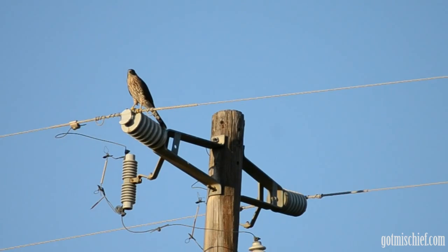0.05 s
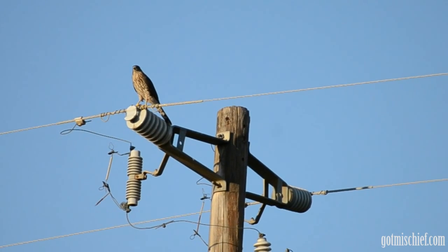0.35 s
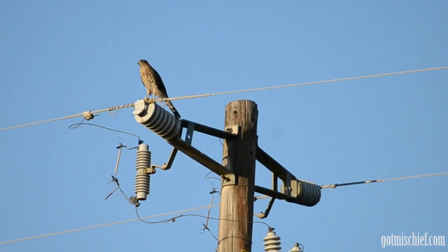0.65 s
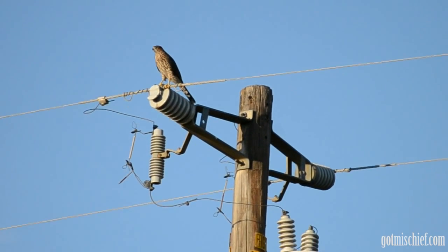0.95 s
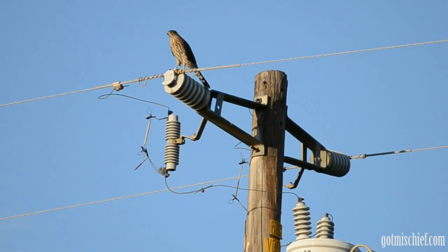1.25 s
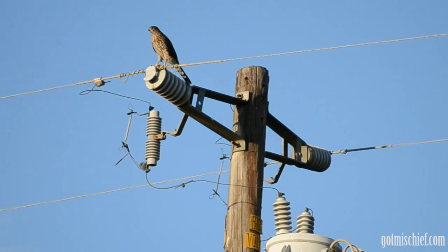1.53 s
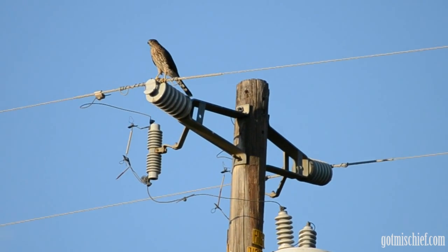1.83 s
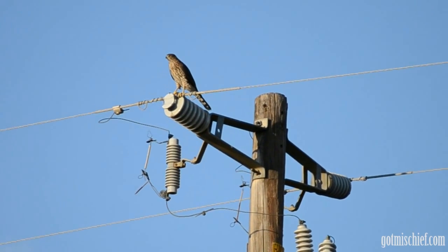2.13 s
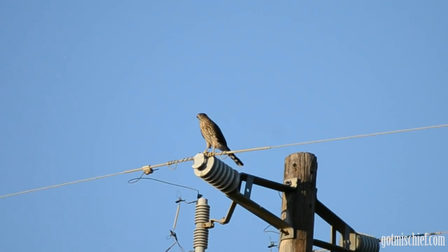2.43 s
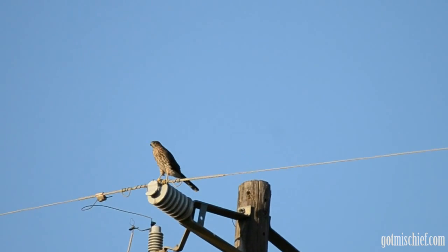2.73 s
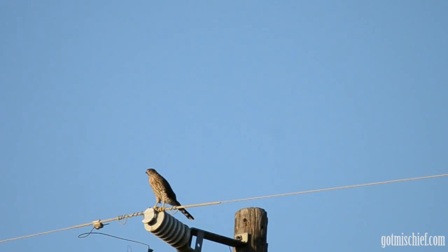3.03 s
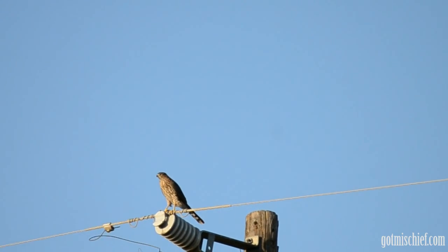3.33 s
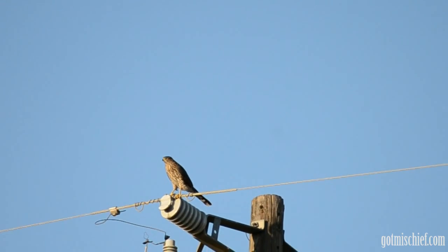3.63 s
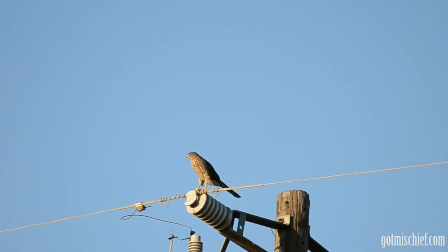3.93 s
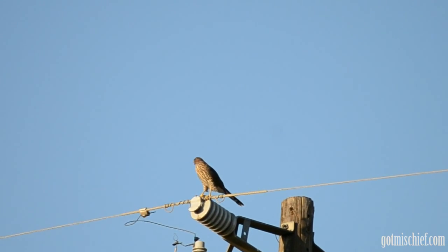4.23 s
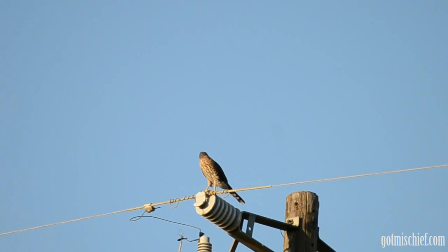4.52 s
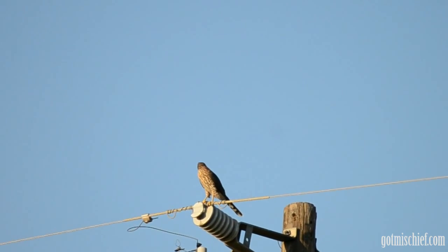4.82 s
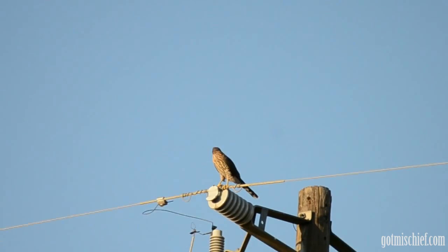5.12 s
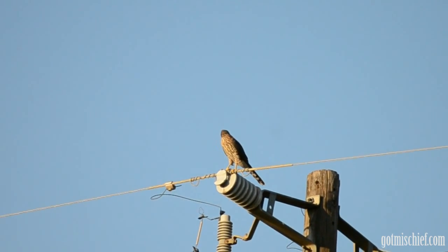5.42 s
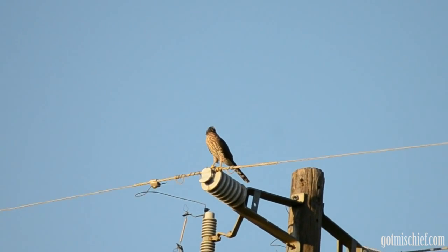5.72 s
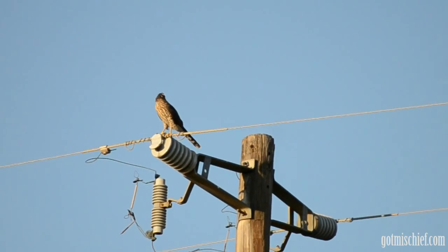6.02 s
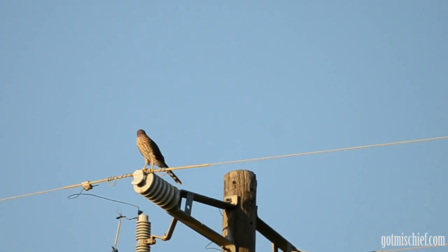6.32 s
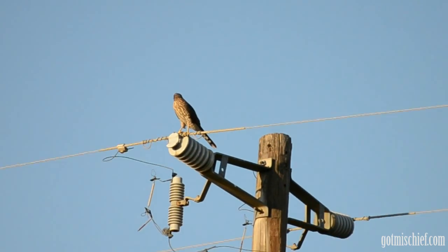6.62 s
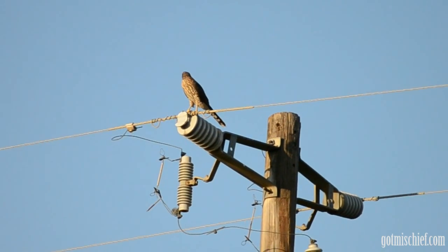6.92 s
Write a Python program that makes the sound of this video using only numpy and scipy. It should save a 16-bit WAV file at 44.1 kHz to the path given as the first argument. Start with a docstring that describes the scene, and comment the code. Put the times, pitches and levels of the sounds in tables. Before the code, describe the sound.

A soft, even rush of air and distant traffic fills a quiet neighbourhood throughout, with a faint low hum that dies away by 1 second. Right at the start, someone close to the microphone sucks air through wet lips, making a short, high squeak that slides sharply down. Another comes at about 1.2 seconds and a weaker one at 2.7, with soft lip pops near 1.3 and 1.9. A far bird faintly whistles three falling calls, at the start, 1.6 and 3.2 seconds. Four single hand claps follow at about 3.7, 4.7, 5.8 and 6.9 seconds, the second loudest and the fourth also strong. Each has a slightly hollow crack and echoes among the houses for about a second. One last lip squeak falls at 4.5 seconds, and a few small pops and ticks sound between the claps.

```python
"""Outdoors, over the soft rush of a neighbourhood, someone tries to make a perched hawk turn its head.
First come bird-like squeaks, made by sucking air through wet lips, while a low hum dies away and a
far bird whistles three falling calls. From about 3.7 seconds on, four hand claps echo among the
houses, with one last squeak between the first two."""
import sys
import numpy as np
from scipy import signal
from scipy.fft import rfft, irfft
from scipy.io import wavfile
from scipy.ndimage import map_coordinates

SR = 44100
rng = np.random.default_rng(int(sys.argv[2]) if len(sys.argv) > 2 else 0)


def inscribe(sig):
    """Save sig as 16-bit PCM at rate SR to the path in sys.argv[1].

    A 1-D sig is mono; a 2-D sig holds one channel per row.
    Samples are clipped to [-1, 1] before scaling.
    """
    pcm = np.round(np.clip(np.atleast_2d(sig).T, -1, 1) * 32767)
    wavfile.write(sys.argv[1], SR, pcm.astype(np.int16))


N = 311346
TIME = np.arange(N) / SR


def from_db(db):
    """Turn decibels into a number to multiply by."""
    return 10 ** (np.asarray(db) / 20)


def rms_one(x):
    """Scale a sound to an average power of 1."""
    return x / np.sqrt(np.mean(x ** 2) + 1e-20)


def ramp(x):
    """Rise from 0 to 1 and stay there."""
    return np.clip(x, 0, 1)


def at_hz(points, hz, column=1):
    """Look up a frequency in a table, sliding between its rows."""
    points = np.array(points)
    return np.interp(np.log(np.maximum(hz, 1)), np.log(points[:, 0]), points[:, column])


def add(out, s, sound):
    """Mix a sound in, starting at s seconds."""
    start = int(np.clip(round(s * SR), 0, len(out)))
    out[start:start + len(sound)] += sound[:len(out) - start]


def coloured(x, spectrum):
    """Shape a sound's lows and highs by a table; its power ends up at 1."""
    hz = np.arange(len(x) // 2 + 1) * SR / len(x)
    return rms_one(irfft(rfft(x) * from_db(at_hz(spectrum, hz)), len(x)))


def filtered(x, kind, hz, order=2):
    """Keep the "low" part, the "high" part or one "band" of a sound."""
    return signal.sosfilt(signal.butter(order, hz, kind, fs=SR, output="sos"), x)


def boosted(x, hz, width, db):
    """Lift or lower one narrow band of frequencies."""
    return x + (from_db(db) - 1) * signal.lfilter(*signal.iirpeak(hz, hz / width, fs=SR), x)


def drift(rate, size):
    """Wander smoothly around 0, through `rate` random values a second."""
    steps = np.arange(size) * rate / SR
    return map_coordinates(rng.standard_normal(int(steps[-1]) + 4), [steps + 1], order=3, mode="nearest")


def ring(hz, t60):
    """A fading tone. Here and below, t60 is the seconds it takes to fade by 60 dB."""
    t = TIME[:SR // 8]
    return np.sin(2 * np.pi * hz * t) * from_db(-60 * t / t60)


def scattered(x, t60):
    """Many small reflections blur a sound."""
    t = TIME[:SR // 2]
    scatter = rng.standard_normal(len(t)) * from_db(-60 * t / t60)
    return signal.fftconvolve(x, scatter / np.linalg.norm(scatter))[:N]


def drone(hz, width):
    """A narrow, wavering band of noise around one pitch."""
    phase = 2 * np.pi * hz * TIME
    return drift(width, N) * np.sin(phase) + drift(width, N) * np.cos(phase)


def background(rush_db=-55.43, sway_db=-0.8, hum_db=-69, hum_end_s=0.97, hum_fade_s=0.23):
    """Distant traffic and air make an even rush, with faint drones and a brief far hum."""
    # The tone of the rush. Each row: frequency in Hz, relative level in dB.
    air = [(15, -45.5), (25, -19.5), (48, -18), (145, -9), (192, -3.5), (433, -2), (468, 0.5), (573, -5.5),
           (619, -2), (668, -2), (2580, -13), (2930, -15), (3590, -19.5), (8970, -23), (11000, -39),
           (14300, -70.5), (22000, -120)]
    # Steady drones. Each row: pitch in Hz, width in Hz, level in dB.
    drones = [(59.4, 6, -80.5), (237, 11, -80.5), (416, 14, -71.5), (596, 20, -70), (2986, 470, -69.5),
              (4540, 200, -79.5)]
    out = from_db(rush_db + sway_db * drift(4.61, N)) * coloured(rng.standard_normal(N), air)
    for hz, width, level_db in drones:
        out += from_db(level_db) * drone(hz, width)
    out += from_db(hum_db) * ramp((hum_end_s - TIME) / hum_fade_s) * drone(hz=189, width=24.4)
    return boosted(out, hz=7950, width=550, db=-15)  # a narrow dip in the hiss


def far_bird(waver=0.0095, edge_s=0.02, blur_db=1):
    """A far bird whistles two notes at once; they waver in the air and are blurred by echoes."""
    # The two notes. Each row: seconds into the call, pitch ratio, relative level in dB.
    low_note = [(0, .97, -7), (.04, 1.075, -6), (.11, 1.1, -3.5), (.19, 1, 3.5), (.28, .958, -6),
                (.49, .87, -11)]
    high_note = [(.03, 1.245, -7.5), (.07, 1.271, -7), (.175, 1.247, -8), (.2, 1.1, -8), (.235, 1.008, -8),
                 (.33, .98, -19)]
    # Each row: start in seconds, pitch in Hz, slide depth, level in dB, extra dB for the high note.
    calls = [(-.08, 3435, .5, -59.5, -14), (1.56, 3710, 1, -58, -1.5), (3.155, 3810, 0.98, -59, 1)]
    # One clear echo. Its row: delay in seconds, relative level in dB.
    echoes = [(.082, -5.5)]
    direct = np.zeros(N)
    for start, hz, depth, level_db, high_db in calls:
        for note, note_db in (low_note, level_db), (high_note, level_db + high_db):
            s, ratio, db = np.transpose(note)
            t = TIME[(TIME > start + s[0]) & (TIME < start + s[-1])] - start
            pitch = hz * np.interp(t, s, ratio) ** depth * (1 + waver * drift(251, len(t)))
            fade = ramp(np.minimum(t - t[0], t[-1] - t) / edge_s)
            level = from_db(note_db + np.interp(t, s, db)) * fade
            add(direct, start + t[0], level * np.sin(2 * np.pi * np.cumsum(pitch) / SR))
    out = direct + from_db(blur_db) * scattered(direct, t60=0.92)
    for delay, echo_db in echoes:
        add(out, delay, from_db(echo_db) * direct)
    return out


def ticks(grit=0.52, lowest_hz=500):
    """Soft lip pops and small ticks: short, gritty rings with no bass."""
    # Each row: start in seconds, level in dB, pitch in Hz, fade time in seconds.
    events = [(1.339, -40, 885, 0.038), (1.896, -39, 950, 0.022), (4.319, -44, 8740, 0.0035),
              (4.415, -47, 9550, 0.016), (4.602, -38.5, 1020, 0.015), (4.963, -39, 770, 0.066),
              (6.16, -38, 2780, 0.014), (6.184, -43.5, 4160, 0.0083)]
    out = np.zeros(N)
    for s, level_db, hz, t60 in events:
        sound = ring(hz, t60)
        add(out, s, from_db(level_db) * sound * (1 + grit * drift(2850, len(sound))))
    return filtered(out, "high", lowest_hz)


def squeak(glide, stroke, jitter=0.022, waver=0.0068, flutter_db=3, rasp=0.96, rolloff=3.1,
           pops_per_s=420, pop_db=-3, hiss_db=-7, edge_s=0.0008):
    """Wet lips vibrate like a tiny reed while air hisses and saliva crackles in the gap."""
    # The narrow gap and the mouth favour high sounds. Each row: frequency in Hz, boost in dB.
    lip_colour = [(1000, -14.5), (2500, -8), (4300, -5.5), (6000, -9.5), (7400, 1.5), (8800, 9.5),
                  (10300, 4), (12000, -28.5)]
    catch_s, parting_s, overtones_db, wet_db, parting_db = stroke
    s, hz, db = np.transpose(glide)
    size = max(int((s.max() - s[0]) * SR), 64)
    t = TIME[:size]
    left = t[-1] - t
    pitch = np.interp(s[0] + t, s, hz)
    suction = from_db(np.interp(s[0] + t, s, db)) * ramp(np.minimum(t, left) / edge_s)
    # The lips are quieter until they catch; as they part, more air leaks.
    slipping = 1 - ramp((t - catch_s) / 0.0027 + .5)
    parting = ramp((parting_s - left) / 0.01)
    swing = from_db(-13 * slipping)
    leak = from_db(wet_db - 4 * slipping + 2 * parting)
    # The wetter the gap, the more unevenly the lips swing.
    wetness = leak / (leak + swing)
    wobble = 1 + jitter * wetness * drift(820, size) + waver * drift(352, size)
    phase = 2 * np.pi * np.cumsum(pitch * wobble) / SR
    # Overtones flare as they glide through the lips' resonance; the octave fades as the lips part.
    orders = np.arange(2, 10)[:, None]
    weights = from_db(at_hz(lip_colour, orders * pitch) - 9.5 * parting * (orders == 2))
    weights *= (2 / orders) ** rolloff * (orders * pitch < SR / 3)
    overtones = np.sum(weights * np.sin(orders * phase), axis=0)
    overtones *= from_db(overtones_db + flutter_db * drift(309.6, size))
    base_note = from_db(at_hz(lip_colour, pitch) + parting_db * parting) * np.sin(phase)
    tone = (base_note + overtones) * (1 + rasp * wetness * drift(1500, size))
    # Films of saliva burst at uneven intervals.
    pop_count = np.floor(np.cumsum(pops_per_s * from_db(4 * drift(400, size))) / SR)
    pops = np.diff(pop_count, prepend=-1) * rng.uniform(0.46, 1, size)
    crackle = from_db(pop_db) * coloured(pops, lip_colour)
    hiss = from_db(hiss_db) * coloured(rng.standard_normal(size), lip_colour)
    return suction * (np.sqrt(2) * swing * tone + leak * (hiss + crackle))


def lips(scatter_db=-16):
    """Close squeaks ring in the mouth and scatter faintly off the ground and things nearby."""
    # One list per squeak. Each point: time in seconds, pitch in Hz, suction in dB.
    glides = [
        [(0.003, 9660, -31.5), (0.027, 5400, -34.5), (0.04, 4130, -31), (0.056, 3410, -33),
         (0.065, 3015, -26.5), (0.078, 2060, -30), (0.094, 880, -37.5)],
        [(1.082, 7000, -48), (1.089, 5830, -44), (1.1, 8340, -58)],
        [(1.165, 7480, -33), (1.19, 5200, -32), (1.204, 5255, -31), (1.209, 4480, -33.5), (1.218, 3720, -31),
         (1.226, 3750, -32), (1.232, 4280, -31.5), (1.258, 2980, -28), (1.284, 1176, -30)],
        [(2.633, 3400, -45), (2.644, 3970, -46), (2.654, 4510, -37.5)],
        [(2.652, 6700, -34), (2.658, 7040, -38), (2.667, 5750, -48), (2.678, 4760, -46.5), (2.687, 4840, -50),
         (2.695, 4040, -47), (2.705, 3250, -52)],
        [(2.7, 2420, -59), (2.707, 2280, -48), (2.713, 1545, -52), (2.721, 2215, -55), (2.742, 2123, -47),
         (2.757, 1640, -55)],
        [(4.434, 4920, -45), (4.446, 4430, -35.5), (4.464, 5260, -38), (4.471, 5270, -41), (4.48, 5330, -34),
         (4.489, 5570, -41), (4.504, 5400, -42.5)],
        [(4.504, 5400, -44), (4.515, 5200, -50), (4.521, 4960, -45), (4.529, 4650, -50.5), (4.536, 3730, -38.5),
         (4.544, 2590, -42), (4.562, 1480, -59.5)],
    ]
    # How the lips move in each squeak. Each row: seconds until they catch, seconds spent parting,
    # overtones in dB, wet noise in dB, boost of the base note while parting in dB.
    strokes = [(.024, .036, -4, -9.5, 3), (.0005, .001, -10, -19.5, -2), (.023, 0.054, -4.5, -6.5, 1.5),
               (.001, .001, -6.5, -4, 2.5), (0.00091, .001, -2.5, -5, -2), (.001, 0.019, 9, -9.5, 18),
               (.026, 0.00098, -2.5, -5, -0.5), (.001, 0.023, 9.5, 5, 11.5)]
    # The mouth's resonances and a hollow, plus the microphone's narrow dip near 8 kHz.
    # Each row: frequency in Hz, width in Hz, boost in dB.
    bands = [(4650, 350, -5), (5360, 330, 5), (7570, 230, 6.5), (7880, 450, -7.5), (10050, 351, 2.5)]
    out = np.zeros(N)
    for glide, stroke in zip(glides, strokes):
        add(out, glide[0][0], squeak(glide, stroke))
    for hz, width, db in bands:
        out = boosted(out, hz, width, db)
    return out + from_db(scatter_db) * scattered(out, t60=0.1324)


def street_echo(brightness_db, build_s=0.017, flicker_db=1):
    """Countless small reflections from walls and trees build up, then die away band by band."""
    # Each row: frequency in Hz, relative level in dB, fade time in seconds.
    street = [(100, -12, 0.83), (230, -7.5, 0.46), (446, -13, 0.4), (800, -6, 0.9), (1030, -5.5, 1.01),
              (1350, 1.5, 1.3), (2170, 0.5, 1.15), (3220, -3.5, 0.98), (4500, -5.5, 0.83),
              (6160, -12.5, 0.68), (9050, -19.5, 0.73), (10400, -44.5, 0.18)]
    t = TIME[:SR]
    edges_hz = 90 * 2 ** (np.arange(22) / 3)
    noise = rng.standard_normal((2, SR))
    out, power = 0, 0
    for k, (low, high) in enumerate(zip(edges_hz, edges_hz[1:])):
        hz = np.sqrt(low * high)
        band = rms_one(filtered(noise[k % 2], "band", [low, high]))
        gain = from_db(at_hz(street, hz) + brightness_db * np.log2(hz / 1500)) * np.sqrt(high - low)
        out += gain * band * from_db(-60 * t / at_hz(street, hz, column=2))
        power += gain ** 2
    build_up = 1 - np.exp(-t / build_s)
    return out / np.sqrt(power) * build_up * from_db(flicker_db * drift(153.8, SR))


def slap(hold_s=0.0053, t60=0.045, dull_hz=2200, contact_s=0.0028):
    """The palms first squeeze a cushion of air, then skin meets skin; the burst dies quickly."""
    # The tone of skin on skin. Each row: frequency in Hz, relative level in dB.
    crack = [(100, -11), (230, -0.5), (400, -22), (700, -0.5), (1150, 2.5), (1900, 2), (2800, -10.5),
             (4300, -7.5), (7000, -29), (10000, -30), (11500, -75)]
    t = TIME[:SR // 8]
    noise = coloured(rng.standard_normal(len(t)), crack)
    cushion = filtered(noise, "low", dull_hz)
    contact = 1 - np.exp(-(t / contact_s) ** 2)
    fade = from_db(-60 * np.maximum(t - hold_s, 0) / t60)
    burst = (cushion + contact * (noise - cushion)) * fade
    return burst / np.sqrt(np.mean(burst[:SR // 150] ** 2))  # power 1 over the first 7 ms


def claps(pocket_t60=0.065, rise_s=0.0018, bass_hz=610, lowest_hz=170):
    """Hands slap, the pocket of air between the palms rings, and the walls and street answer."""
    # Each row: start in seconds, slap in dB, air pocket's pitch in Hz and level in dB, bass boost in
    # dB, echo in dB, echo brightness in dB per octave, echo's hollow note in Hz and its boost in dB.
    hits = [(3.6613, -34.5, 772, -22, 3.5, -34, 0.85, 785, 7.5),
            (4.6920, -24, 771, -13.5, -17.5, -28.5, -1, 757, 9),
            (5.7546, -32, 814, -30, 5, -34.5, 1.5, 880, 5.5),
            (6.8826, -25.5, 726, -22.5, -1.5, -29, -0.5, 1400, 4.5)]
    # Clear reflections off walls. Each row: delay in seconds, relative level in dB.
    walls = [(.019, -7.5), (.03, -11), (.096, -11), (0.363, -21)]
    # Rows of houses send the sound back in swells. Each row: delay in seconds, boost in dB.
    swells = [(0, 7), (.04, 0.5), (.07, 0), (.105, 0.5), (.17, -1.5), (.27, 0.5), (.37, 2.5), (.44, 0),
              (.7, -2)]
    # Notes that ring on in every echo. Each row: pitch in Hz, width in Hz, boost in dB.
    echo_notes = [(447, 33, 13), (880, 30, 7.5), (1154, 67, 3.5), (1490, 7.9, 5.5), (1666, 21, -4.5),
                  (2232, 23, 5), (4720, 130, 3.5)]
    out = np.zeros(N)
    swell = from_db(np.interp(TIME[:SR], *np.transpose(swells)))
    rise = 1 - np.exp(-TIME[:SR // 8] / rise_s)
    for s, slap_db, pocket_hz, pocket_db, bass_db, echo_db, brightness_db, hollow_hz, hollow_db in hits:
        sound = from_db(echo_db) * swell * street_echo(brightness_db)
        # The echo also keeps the hollow note of the palms.
        for hz, width, db in echo_notes + [(hollow_hz, hollow_hz / 12, hollow_db)]:
            sound = boosted(sound, hz, width, db)
        for delay, wall_db in [(0.001, 0)] + walls:  # the direct slap, then its reflections
            add(sound, delay, from_db(slap_db + wall_db) * slap())
        # Well-cupped hands give off little bass.
        bass = from_db(bass_db) * filtered(sound, "low", bass_hz, order=4)
        treble = filtered(sound, "high", bass_hz, order=4)
        add(out, s, bass + treble)
        add(out, s, from_db(pocket_db) * ring(pocket_hz, pocket_t60) * rise)
    return filtered(out, "high", lowest_hz)


def scene():
    """Mix all the sounds into one channel."""
    return (lips() + ticks() + claps() + far_bird() + background())[None]


def record(dry, cutoff_hz=11100):
    """Cut off the highest treble steeply."""
    return signal.sosfilt(signal.ellip(10, .2, 70, cutoff_hz, fs=SR, output="sos"), dry)


dry = scene()
out = record(dry)
inscribe(out)
```